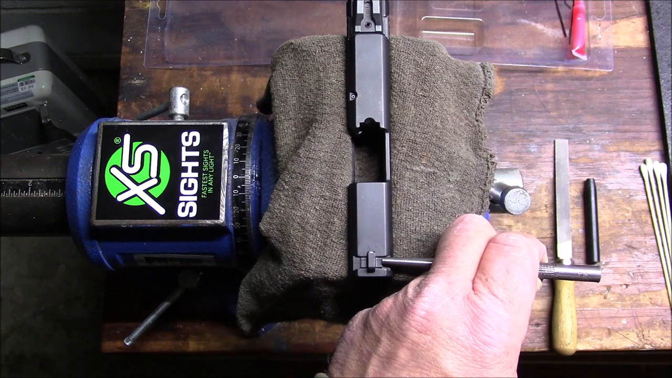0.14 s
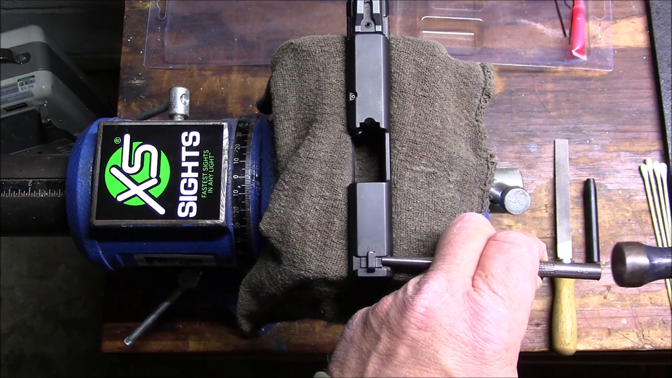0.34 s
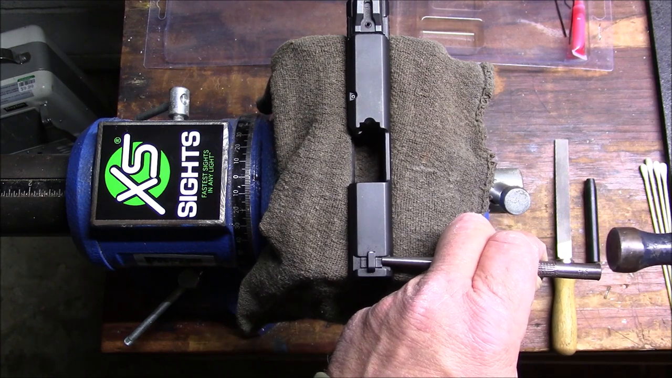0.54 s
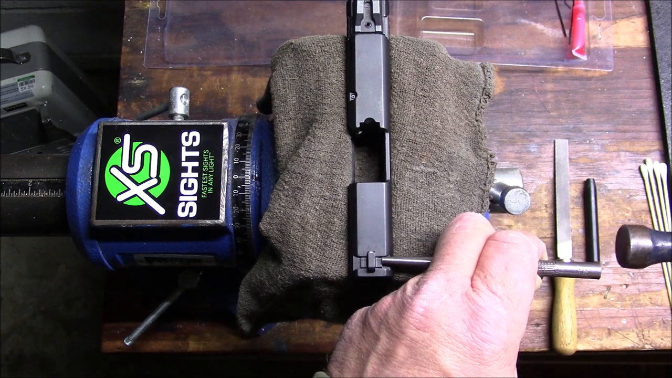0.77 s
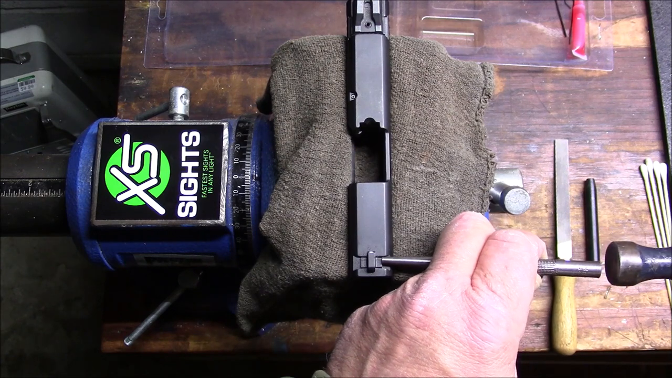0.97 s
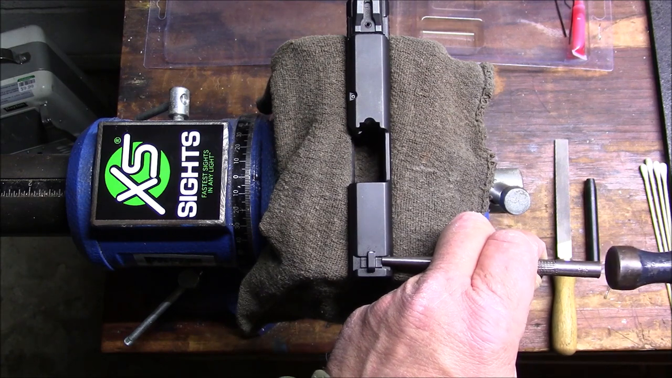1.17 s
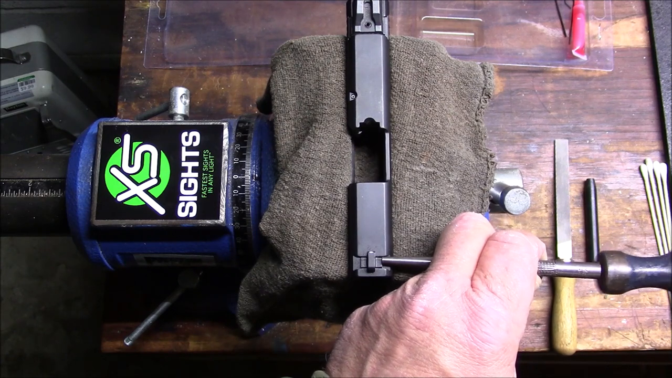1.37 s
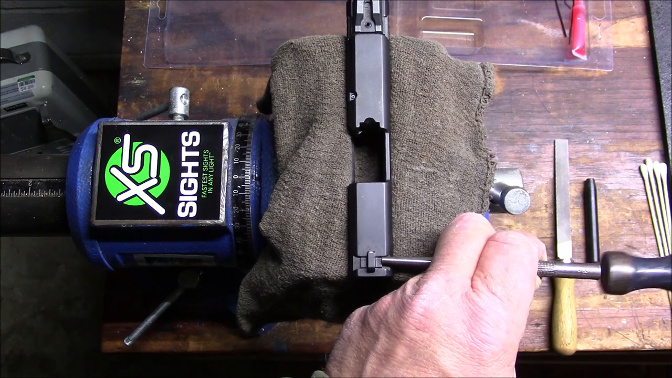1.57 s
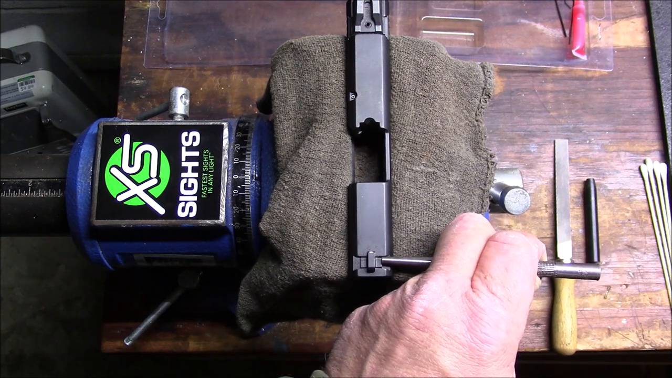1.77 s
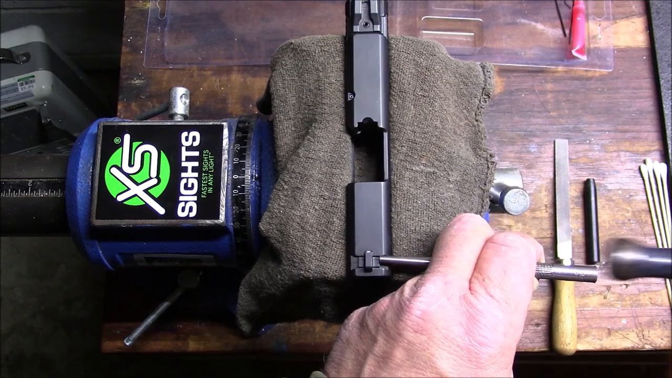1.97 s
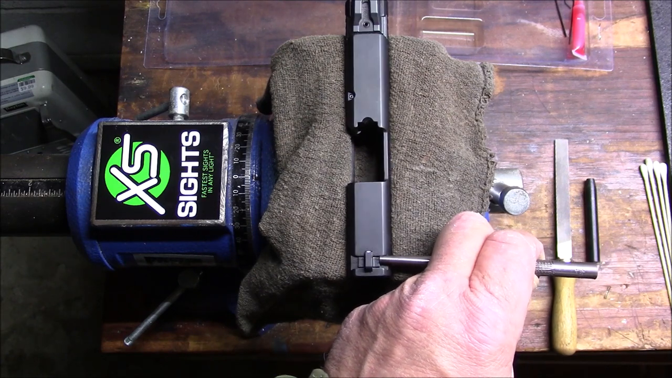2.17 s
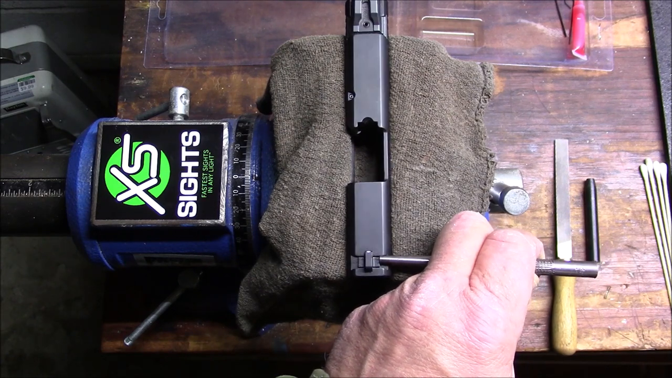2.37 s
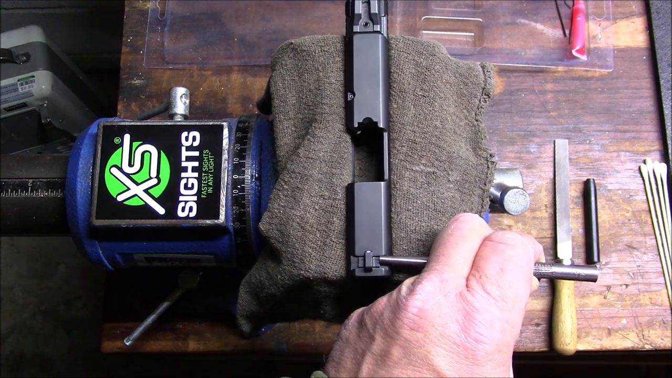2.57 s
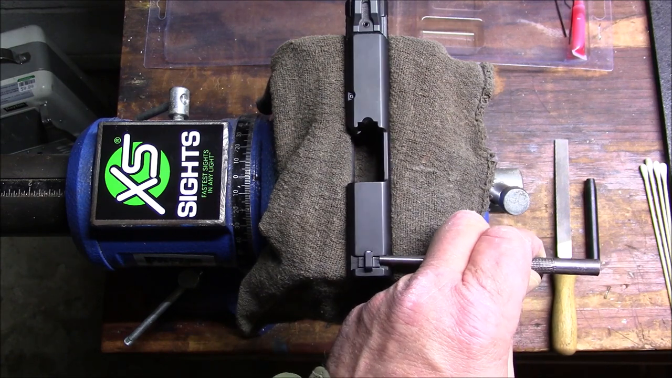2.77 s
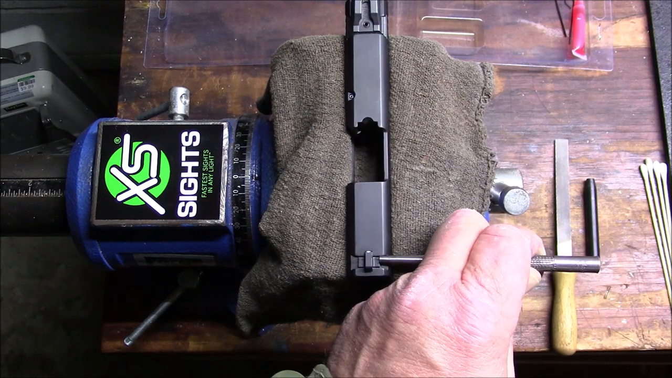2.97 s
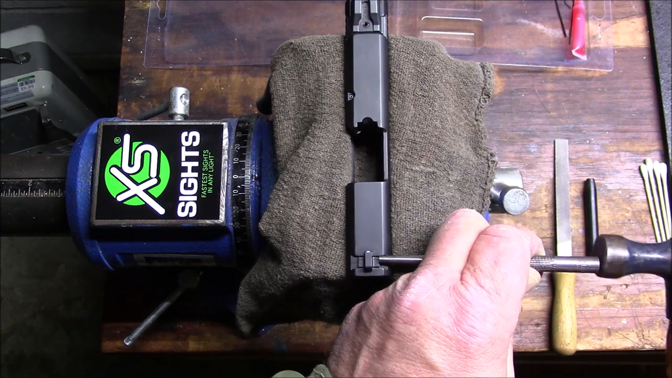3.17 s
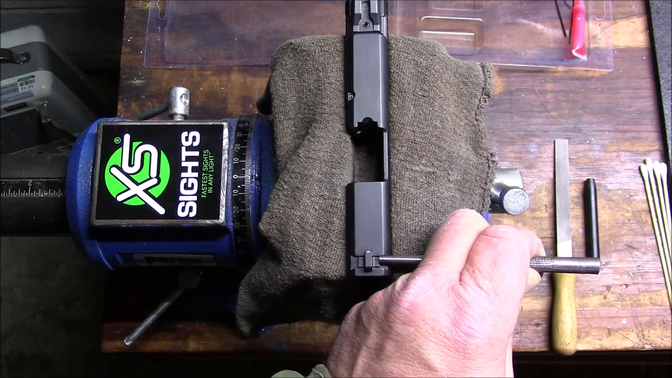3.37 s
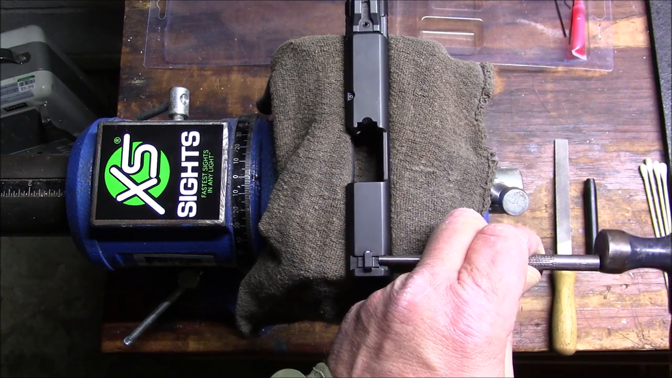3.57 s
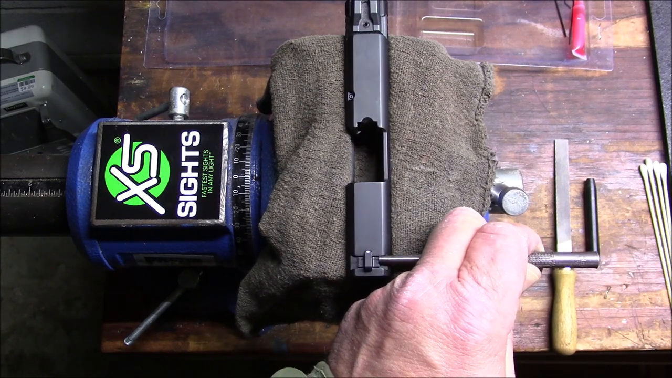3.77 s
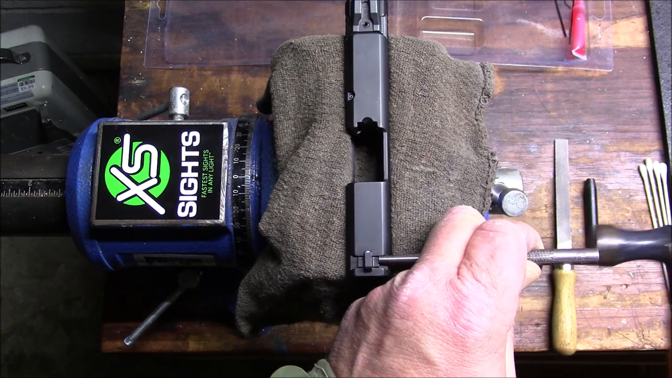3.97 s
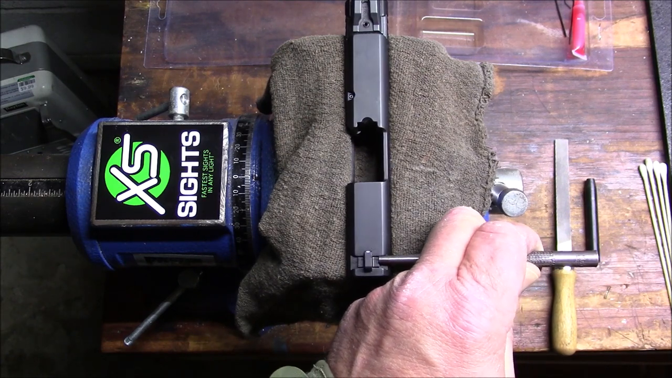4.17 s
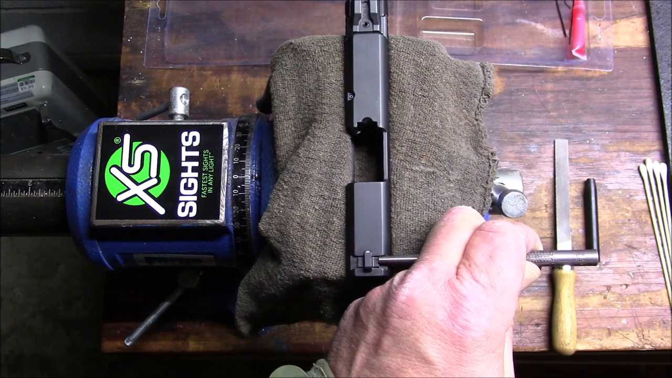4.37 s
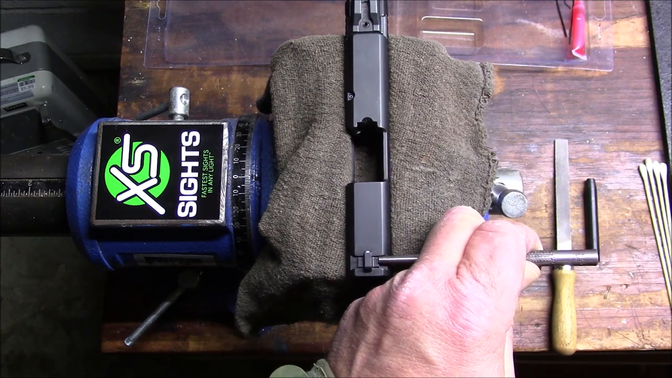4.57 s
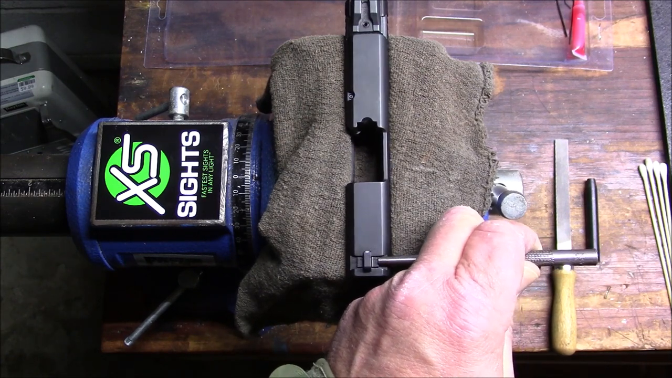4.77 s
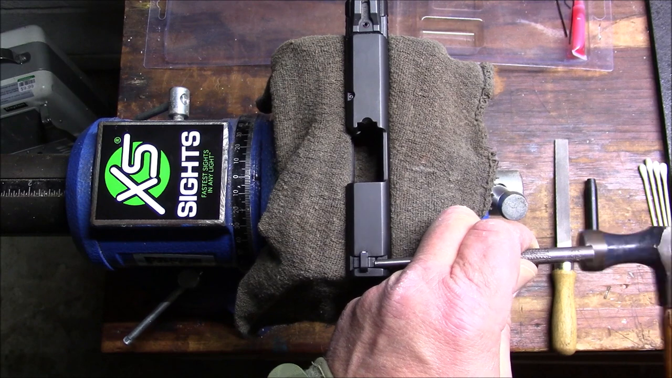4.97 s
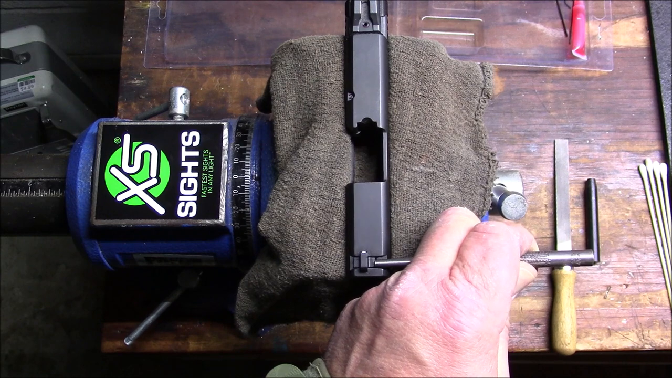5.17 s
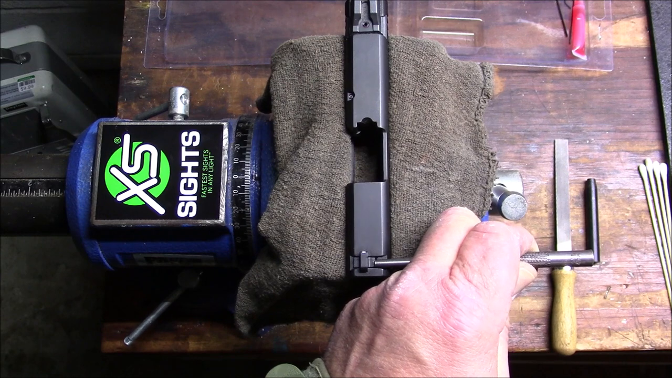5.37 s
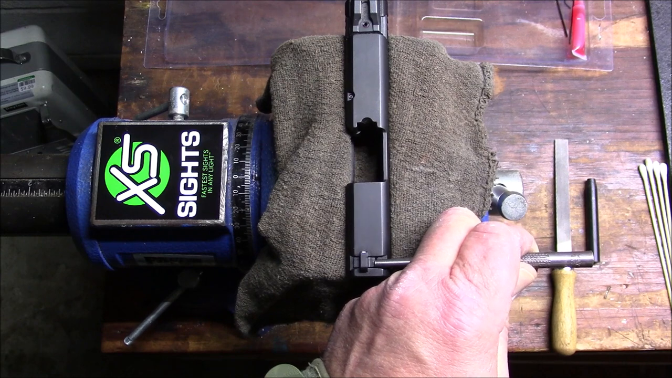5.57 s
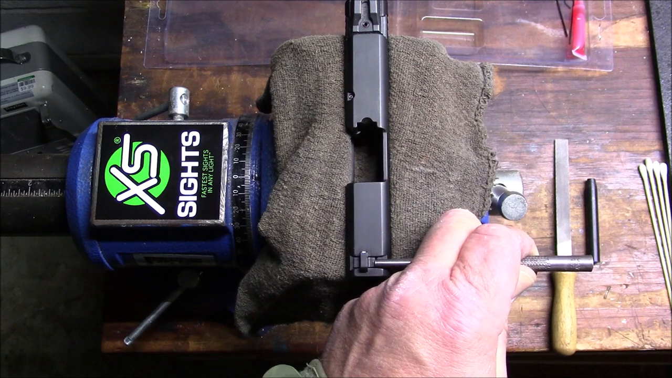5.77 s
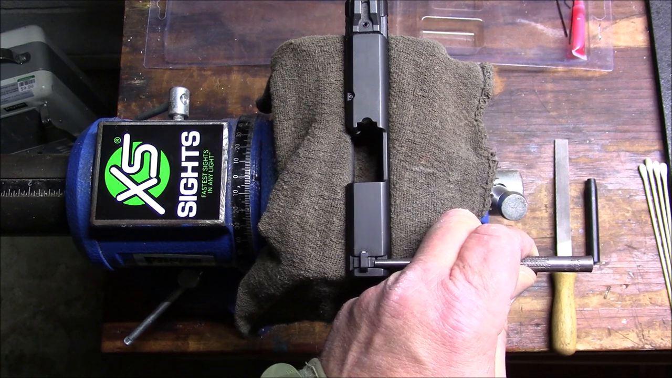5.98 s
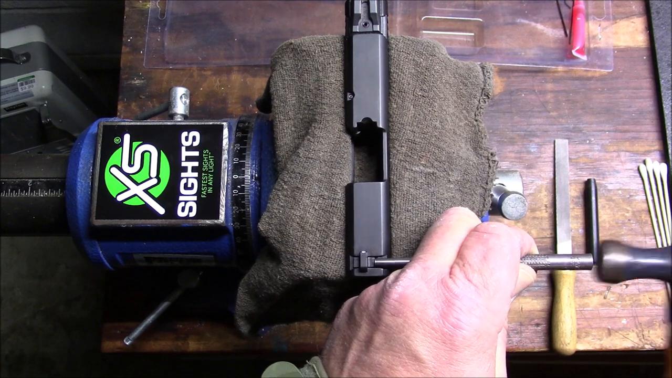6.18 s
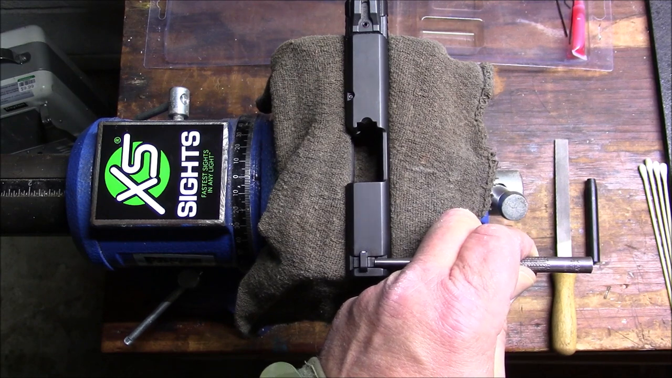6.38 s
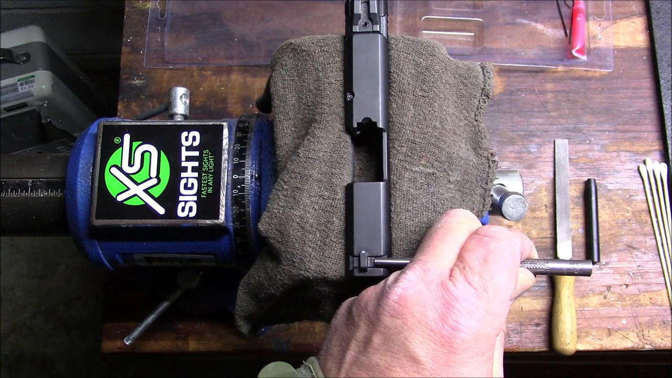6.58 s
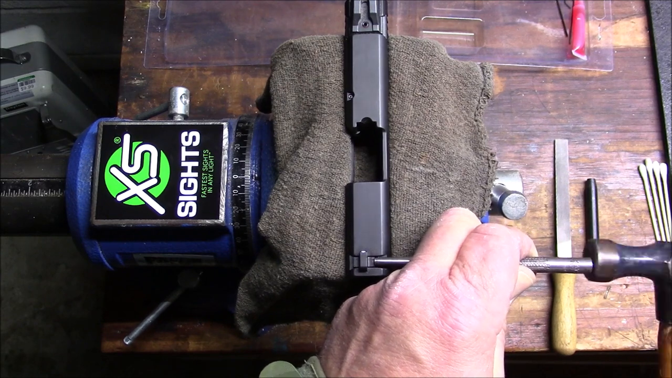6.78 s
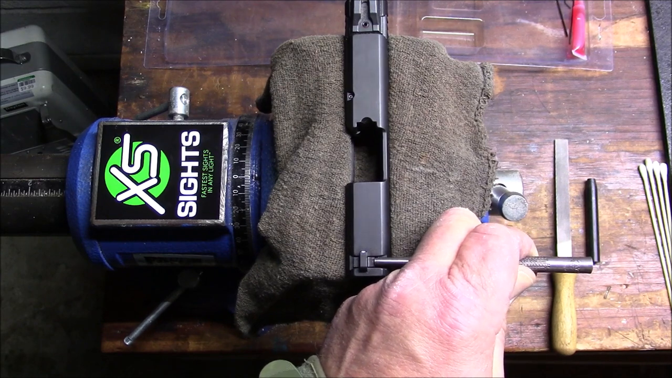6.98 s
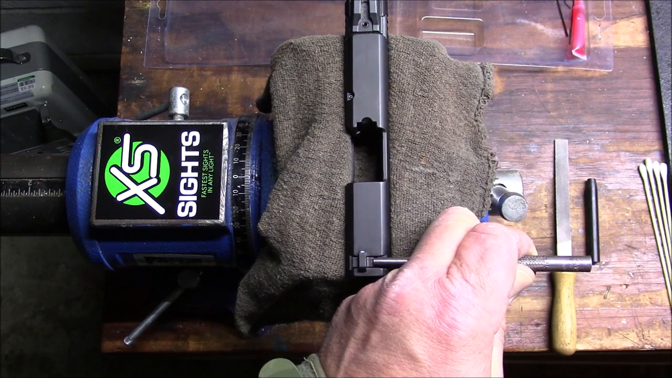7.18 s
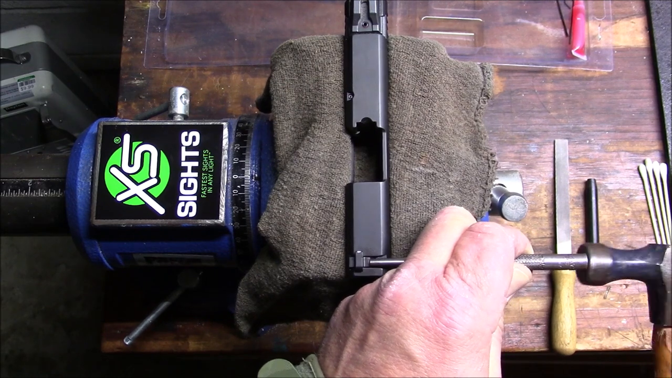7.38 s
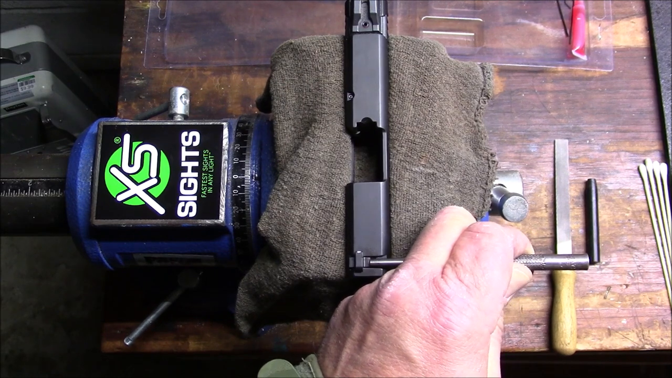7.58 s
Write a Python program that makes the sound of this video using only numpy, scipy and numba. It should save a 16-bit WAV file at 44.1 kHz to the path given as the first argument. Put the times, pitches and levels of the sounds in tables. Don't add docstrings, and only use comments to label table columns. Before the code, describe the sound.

In a small hard-walled workshop, a steel hammer touches a punch with a clink and scrape, gives three light bouncing taps, then lands twelve hard blows in two bursts. Each is a sharp metallic crack with short high ringing and a half-second echo. The close microphone overloads, ducks and lets the echo swell back over faint hum and cloth rustle.

```python
import sys
import numpy as np
from scipy import signal
from scipy.fft import rfft, irfft, next_fast_len
from scipy.io import wavfile
from scipy.ndimage import minimum_filter1d, map_coordinates
from numba import njit

SR = 44100
rng = np.random.default_rng(int(sys.argv[2]) if len(sys.argv) > 2 else 0)


def generate_wav(sig):
    pcm = np.round(np.clip(np.atleast_2d(sig).T, -1, 1) * 32767).astype(np.int16)
    wavfile.write(sys.argv[1], SR, pcm)


def gain_from_db(level_db):
    decades = np.asarray(level_db, float) / 20
    return 10 ** decades


N = 336703


def unit(x):
    return x / np.sqrt(np.mean(x ** 2) + 1e-20)


def along(points, hz):
    f, v = np.transpose(points)
    return np.interp(np.log(hz + 1), np.log(f + 1), v)


def peaked(hz, peaks):
    return sum(db / (1 + (2 * (hz - c) / w) ** 2) for c, w, db in peaks)


def wobble(rate, count=N):
    knots = rng.standard_normal(int(count * rate / SR) + 4)
    return map_coordinates(knots, [np.arange(count) * rate / SR])


def noise(spectrum):
    m = next_fast_len(N + 8192)
    colour = gain_from_db(along(spectrum, np.fft.rfftfreq(m, 1 / SR)))
    return unit(irfft(rfft(rng.standard_normal(m)) * colour, m)[:N])


def pulse(gain_db):
    cep = irfft(np.maximum(gain_db, -120) * np.log(10) / 20)
    half = len(cep) // 2
    cep[1:half] *= 2
    cep[half + 1:] = 0
    out = irfft(np.exp(rfft(cep)))
    return out / np.linalg.norm(out)


def add(out, sound, s):
    out[:, round(s * SR):][:, :sound.shape[1]] += sound


def hammer_blows():
    # (time [s], strength [dB], low bar mode [dB], high bar mode [dB],
    #              glancing [-1 square .. 1 skew])
    blows = [(2.0137, 7, -25.5, -22, 1), (3.2598, 1.5, -24.5, -28.5, -0.24), (3.655, 6.5, -16.5, -26, 0.44),
             (4.031, 8.5, -35.5, -21, -0.6), (4.3694, 11.5, -22, -26.5, -.6),
             (4.708, 12.5, -19.5, -20, -.7), (5.0421, 8, -20.5, -11, 0.98), (6.2344, 4, -28, -23.5, .3),
             (6.5552, 7, -29, -22.5, -.15), (6.8646, 8.5, -31, -24.5, -0.56), (7.14, 11, -31.5, -15, -0.25),
             (7.4645, 9, -20.5, -15, .9)]
    # (frequency [Hz], level [dB per Hz])
    colour = [(24, -52), (40, -28.5), (338, 8.5), (469, 5.5), (856, -1), (1100, -5.5), (1600, 4),
              (2580, -5), (3080, -2.5), (7420, -11.5), (12300, -10.5), (15000, -26.5), (16200, -125.5)]
    # (frequency [Hz], width [Hz], level [dB])
    steel = [(1040.3, 240, 7.5), (1568, 130, -3), (3072.5, 370, 3.5), (3989, 1000, 3.5), (4962, 900, 2),
             (5664, 1100, 4.5), (7575, 890, 7.5), (8598, 1200, -4), (10216, 3570, 9.5)]
    bench = [(84.3, 7.8, 11.5), (190, 72, 6), (275.4, 7.6, 6), (343.5, 6.1, 4.5), (374.2, 5, 5),
             (553.28, 13, 10.5), (679, 62, 3.5), (863.8, 16, 7.5), (1274.3, 81, 5.5), (1555.7, 37, 8),
             (2005, 7.7, 3.5)]
    face = [(10320, 57, 4.5), (9510, 180, 2.5), (12090, 1200, -6)]
    # (frequency [Hz], level [dB])
    near = [(200, -16.5), (600, -8), (1100, -4), (2300, -3), (3200, 1), (8000, 3), (14000, 1)]
    # (frequency [Hz], width [Hz], level [dB])
    snap = [(949, 120, 8), (1197.8, 340, 7.5), (1859, 120, 6.5), (3197.5, 210, 4.5), (4248, 66, 5),
            (8292, 350, 2.5)]
    usual_db = [-0.9855, 1.6, -1.21, 3.5, -3]
    glance_slope = [-1.43, 0.51, -3, 0.41, -.3]
    ring_slope = [0.085, -.35, 0.26, 0.43, .3]

    s, db, low_db, high_db, glance = np.transpose(blows)
    bench_db = -2 - 3.5 * glance
    bright_db = -1.57 + 3.5 * glance
    extra_ring_db = db + high_db + 15
    parts_db = usual_db + np.outer(glance, glance_slope) + np.outer(extra_ring_db, ring_slope)
    events = np.transpose([s, db, low_db, high_db, bench_db, bright_db])
    return strikes(events, parts_db, colour, steel + bench + face, near, snap, [],
                   gain_db=15, ring_db=-19, wet_db=0.15, early_db=0.5)


def light_taps():
    # (time [s], strength [dB], low bar mode [dB], high bar mode [dB], flight to bounce [s])
    taps = [
        (1.1422, 2, -21, -27, .031),
        (1.339, 3, -35, -31.5, .03),
        (1.4923, 3.5, -32.5, -29.5, .0225),
    ]
    # (frequency [Hz], level [dB per Hz])
    colour = [(24, -73), (40, -94), (221, -7.5), (493, -14), (700, -8), (1130, -9), (3080, -15.5),
              (4490, -18), (7240, -10.5), (10500, -29), (16200, -83)]
    # (frequency [Hz], width [Hz], level [dB])
    vise = [(221, 40, -0.5), (688.2, 70, 13.5), (443.7, 110, 4), (973, 190, 5), (3087, 610, 9.5),
            (5520, 410, 4), (7455, 280, 7.5), (7920, 2000, -6.5), (10690, 500, 6.5)]
    # (frequency [Hz], level [dB])
    near = [(200, -4), (700, -1.5), (1500, 3), (3000, 0.5), (5400, 8), (9400, 7), (14000, 11)]
    # (frequency [Hz], time to fade 60 dB [s], level [dB])
    jaws = [(229.7, .1, -8), (280, .12, -4.5), (380, .08, -7), (465, 0.095, -7), (596, .09, -6),
            (693, 0.12, 3.8), (722, 0.1, -1.5), (850, .07, -5), (979.5, .06, .6), (1600, 0.04, -11)]

    bench_db, bright_db = 3.5, 2
    bounce_db, bounce_ring_db, bounce_bench_db = -13.5, -4.5, 5.5
    events = []
    for s, db, low_db, high_db, flight in taps:
        events.append((s, db, low_db, high_db, bench_db, bright_db))
        events.append((s + flight, db + bounce_db, low_db + bounce_ring_db, high_db + bounce_ring_db,
                       bounce_bench_db, bright_db))
    parts_db = np.zeros((len(events), 5))
    sound = strikes(events, parts_db, colour, vise, near, [], jaws,
                    gain_db=6.0, ring_db=-23.0, wet_db=-4.5, early_db=4.5)
    return signal.sosfilt(signal.butter(3, 170, 'high', fs=SR, output='sos'), sound)


def strikes(events, landing, colour, peaks, near, snap, knocks, gain_db, ring_db, wet_db, early_db):
    # (frequency [Hz], time to fade 60 dB [s], level [dB])
    bar = [(5880, .035, 10), (5880, .15, -1), (5920, .08, -4), (5733, .13, -6), (7147, .24, 0)]
    # (frequency [Hz], width [Hz])
    part_bands = [(1400, 1200), (3500, 1000), (4900, 1100), (7750, 1000), (8650, 600)]

    out, t = np.zeros((2, N + SR)), np.arange(SR // 2) / SR
    hz = np.fft.rfftfreq(len(t), 1 / SR)
    near_db = along(near, hz) + peaked(hz, snap)
    for (s, db, low_db, high_db, dull_db, bright_db), parts_db in zip(events, landing):
        tilt_db = along([(500, dull_db), (1000, 0.0088), (8300, 0.0052), (9700, bright_db),
                         (11000, bright_db), (13000, 0.43 * bright_db)], hz)
        parts = [(c, w, level) for (c, w), level in zip(part_bands, parts_db)]
        body_db = along(colour, hz) + peaked(hz, peaks + parts) + tilt_db
        body_db = body_db + 0.91 * wobble(51.93, count=len(hz))

        struck = (low_db, low_db, low_db, low_db, high_db)
        grip = .7 * wobble(80, count=len(t))
        ring = np.zeros(len(t))
        for (f, t60, level), hit in zip(bar, struck):
            blur = grip * (.5 if f > 7000 else 1)
            ring += gain_from_db(ring_db + hit + level - 60 * t / t60) * np.sin(2 * np.pi * f * t + blur)
        for f, t60, level in knocks:
            ring += gain_from_db(dull_db + level - 31 - 60 * t / t60) * np.sin(2 * np.pi * f * t + grip)
        ring *= np.minimum(t / 0.002, 1)

        straight = gain_from_db(db + gain_db) * (pulse(body_db + near_db) + ring)
        spread = gain_from_db(db + gain_db) * (pulse(body_db) + ring)
        place(out, s, straight, spread, early_db, wet_db)
    return out[:, :N]


def touches():
    # (time [s], strength [dB], knock [Hz], brightness [dB], time to fade 60 dB [s])
    contacts = [
        (0.7275, -6.5, 1004, -16.5, 0.0056),
        (0.779, -11, 2000, -13, 0.0413),
        (2.404, -20, 1500, -32.5, 0.012),
        (2.416, -27, 333, -39.5, 0.017),
        (5.634, -38, 1458, -20, 0.0104),
        (5.666, -35.5, 3000, 0.67, .011),
        (5.740, -36, 3000, 1.5, .03),
        (6.074, -31, 2500, -16, .011),
    ]
    out, t = np.zeros((2, N + SR)), np.arange(SR // 2) / SR
    hz = np.fft.rfftfreq(len(t), 1 / SR)
    for s, db, knock_hz, bright_db, t60 in contacts:
        knock_db = 19 - 7.5 * np.log2(knock_hz / 1000) + .3 * db
        body_db = along([(100, -29.5), (400, 0.0), (2500, -5.5), (5000, bright_db),
                         (8000, bright_db - 7.5), (15000, bright_db - 12.0)], hz)
        body_db = body_db + peaked(hz, [(knock_hz, 0.14 * knock_hz, knock_db), (5950, 300, 14), (7200, 500, 5)])
        scrape = rng.standard_normal(2000) * gain_from_db(-60 * t[:2000] / t60)
        scrape = scrape / np.linalg.norm(scrape)
        straight = gain_from_db(db) * signal.fftconvolve(pulse(body_db), scrape)[:len(t)]
        place(out, s, straight, straight, early_db=-1.0, wet_db=-7.5)
    return out[:, :N]


def place(out, s, straight, spread, early_db, wet_db):
    near_walls, far_walls = shop(straight, spread)
    direct = np.pad(straight, (0, SR // 2)) * np.array([[1], [.08]])
    add(out, direct + gain_from_db(early_db) * near_walls + gain_from_db(wet_db) * far_walls, s)


def shop(straight, spread):
    # (frequency [Hz], time to fade 60 dB [s])
    fade = [(60, 0.4425), (200, 0.3383), (1000, 0.5366), (4000, 0.5305), (8000, 0.4189), (14000, 0.2783)]
    # (frequency [Hz], level [dB])
    wide = [(60, -17.5), (110, -20.5), (200, -1), (380, -35), (700, -20.5), (1290, -23), (2380, -18),
            (4400, -14.5), (8120, -12.5), (15000, -13)]

    hz, t, z = signal.stft(rng.standard_normal((2, 2, SR * 3 // 4)), SR, nperseg=128)
    z[0] *= gain_from_db(-60 * t / 0.044)
    answer = along([(300, 0.01166), (3000, 0.01083)], hz)[:, None]
    z[1] *= gain_from_db(-60 * t / along(fade, hz)[:, None]) * (1 - np.exp(-t / answer))
    z[:, 1] *= gain_from_db(along(wide, hz))[:, None]
    tails = signal.istft(z, SR, nperseg=128)[1]
    echoes = []
    for x, tail in zip((straight, spread), tails):
        tail = tail / np.linalg.norm(tail[0])
        echoes.append(signal.fftconvolve(x[None], tail, axes=1)[:, :SR])
    return echoes


def thuds():
    # (time [s], level [dB])
    jolts = [
        (2.014, -37),
        (3.261, -32.5),
        (4.03, -27),
        (4.369, -22.5),
        (4.708, -32.5),
        (5.042, -11),
    ]
    out, t = np.zeros((2, N + SR)), np.arange(SR // 8) / SR
    push = t / 0.0034 * np.exp(-t / 0.0023) * np.cos(2 * np.pi * 45 * t)
    for s, db in jolts:
        add(out, gain_from_db(db + 13.0) * push * np.array([[1], [.1]]), s)
    return out[:, :N]


def air():
    # (time [s], level [dB])
    tone_level = [(0, -49), (.2, -46), (1.1, -45.5), (1.6, -50), (2.3, -53), (3.2, -55), (5.1, -50.5),
                  (5.7, -53.5), (7.63, -53.5)]
    # (frequency [Hz], level [dB per Hz])
    tone_colour = [(15, -49), (25, -106), (86, -24.5), (118, -6.5), (151, -14.5), (185, -3.5), (250, -8),
                   (385, -7), (1010, -12.5), (1220, -12), (9000, -33), (11700, -48), (19800, -120)]
    rustle_colour = [(1180, -10.5), (2000, 0.5), (2420, 2.5), (4920, 5), (8460, -1), (13900, -6),
                     (16200, -18.5)]
    rumble_colour = [(15, -35.5), (32, -18), (60, -8.5), (85, -3), (110, -4), (200, -40)]
    # (time [s], half length [s], dull level [dB], bright level [dB])
    swishes = [
        (0.273, 0.18, -66, -64.5),
        (1.984, 0.06, -58.5, -59),
        (3.225, 0.0158, -62, -64),
        (5.658, 0.016, -65.5, -60.5),
        (5.988, 0.063, -87.5, -62),
        (6.213, 0.0202, -58, -48),
        (7.445, .016, -56, -49),
    ]
    t = np.arange(N) / SR
    tone_db = np.interp(t, *np.transpose(tone_level))
    swing = np.zeros((2, N))
    for c, w, low, high in swishes:
        swing += gain_from_db([[low], [high]]) * np.exp(-((t - c) / w) ** 2)
    dull, bright = swing
    sway_db = 1.1 * wobble(9)

    tone = gain_from_db(tone_db - 2 + sway_db) + dull
    tone = tone * np.array([noise(tone_colour), gain_from_db(-8.5) * noise(tone_colour)])
    rustle = gain_from_db(tone_db - 14.5 + 0.68 * wobble(16)) + bright
    rustle = rustle * np.array([noise(rustle_colour), gain_from_db(-13.0) * noise(rustle_colour)])
    hum_hz = 119.7
    hum = gain_from_db(tone_db - 8.5 + sway_db) * np.sin(2 * np.pi * hum_hz * t + .4 * wobble(3.4))
    rumble = gain_from_db(tone_db - 17) * noise(rumble_colour)
    return tone + rustle + (hum + rumble) * np.array([[1], [.1]])


def scene():
    # (frequency [Hz], left minus right [dB])
    lean = [(300, -.8), (2000, -.4), (5000, .5)]
    mid, side = hammer_blows() + light_taps() + touches() + thuds() + air()
    lean_db = along(lean, np.fft.rfftfreq(N, 1 / SR)) / 2
    return irfft(rfft([mid + side, mid - side]) * gain_from_db([lean_db, -lean_db]), N)


@njit
def duck(need_db, attack, release_db):
    gain = np.zeros(len(need_db))
    for i in range(1, len(gain)):
        gap = need_db[i] - gain[i - 1]
        gain[i] = gain[i - 1] + (attack * gap if gap < 0 else min(gap, release_db))
    return gain


def low_pass(x):
    return signal.sosfilt(signal.butter(12, 16310, fs=SR, output="sos"), x)


def record(dry):
    peak = -minimum_filter1d(-np.abs(dry).max(0), size=301, origin=150)
    need_db = np.minimum(-4.5 - 20 * np.log10(peak + 1e-9), 0)
    x = dry * gain_from_db(duck(need_db, 1 / (0.0175 * SR), 300 / SR))
    x = x / (1 + np.abs(x) ** 8) ** (1 / 8)
    return low_pass(x)


dry = scene()
out = record(dry)
generate_wav(out)
```